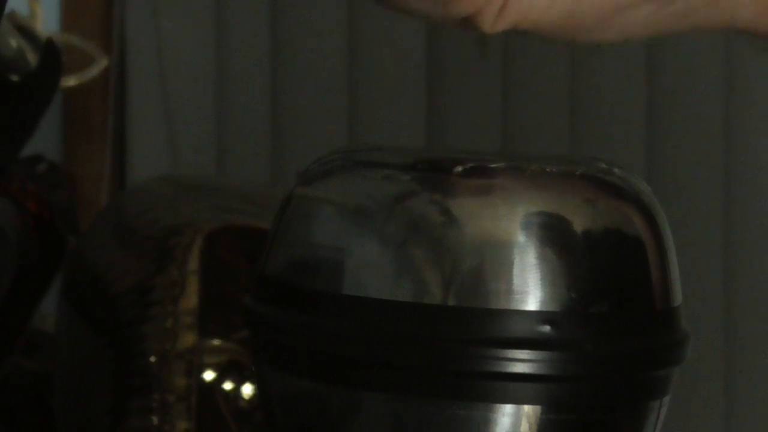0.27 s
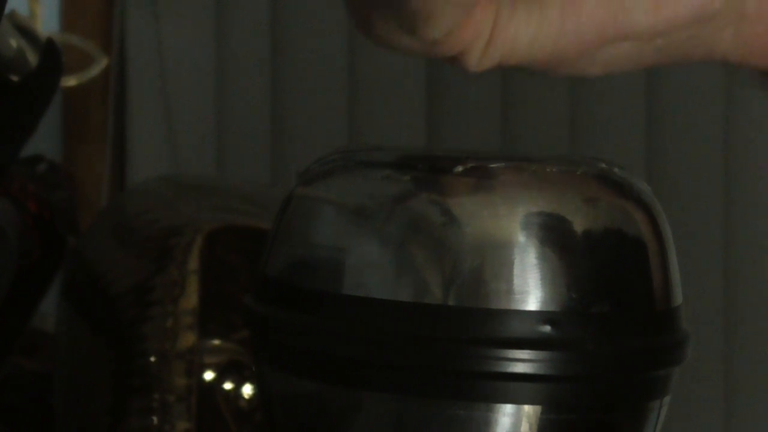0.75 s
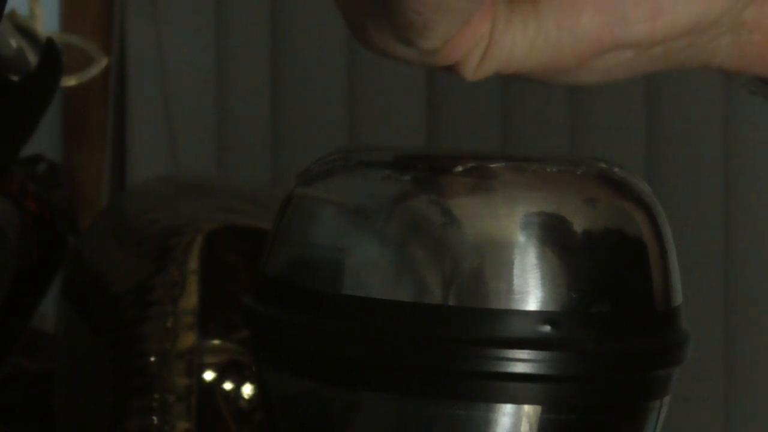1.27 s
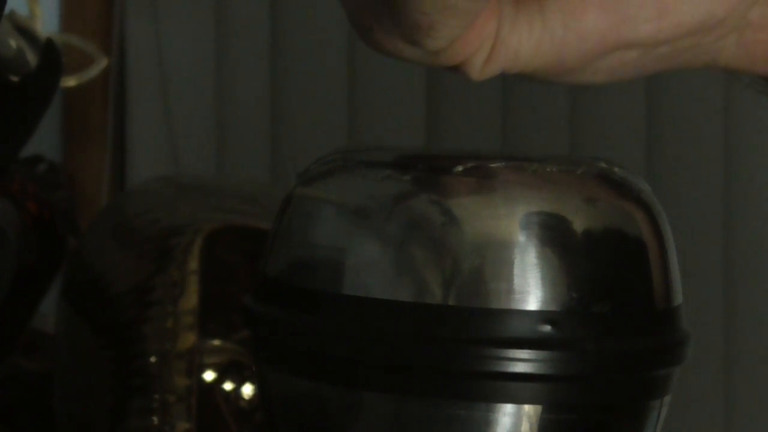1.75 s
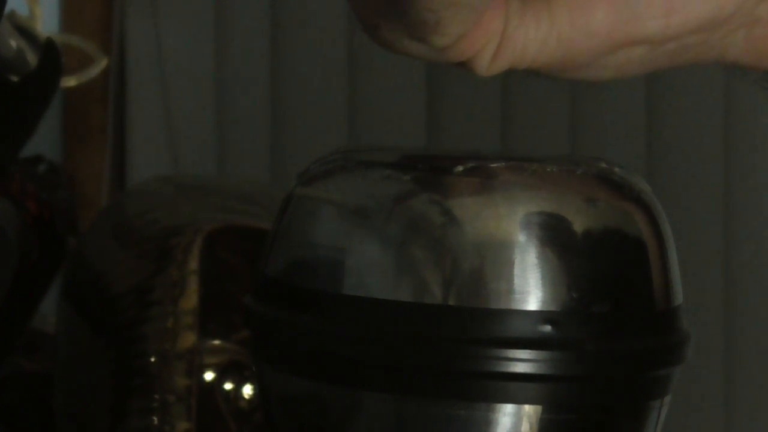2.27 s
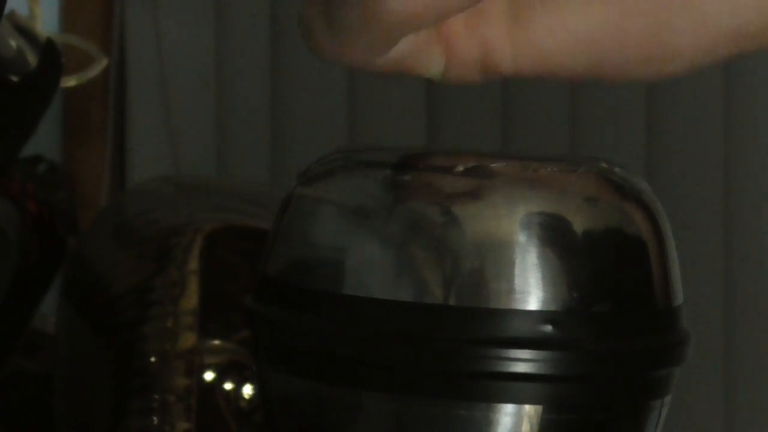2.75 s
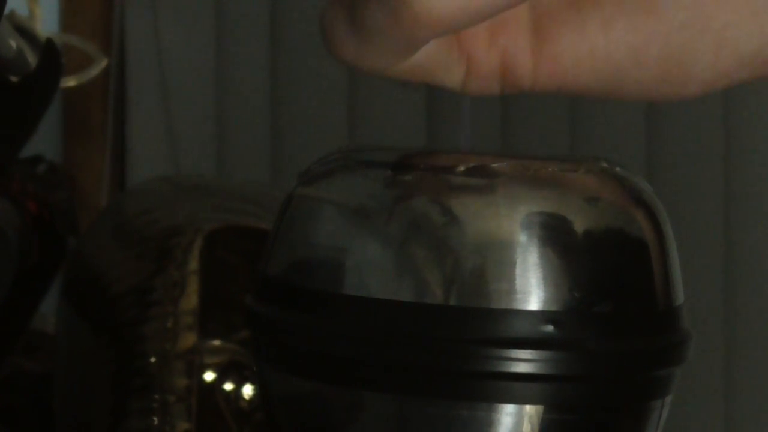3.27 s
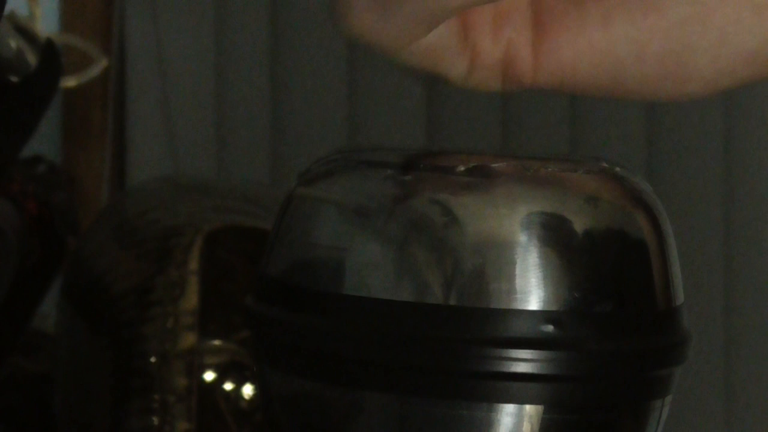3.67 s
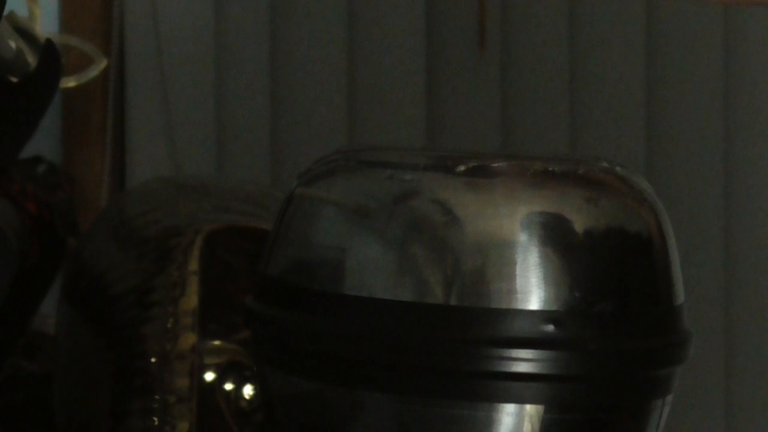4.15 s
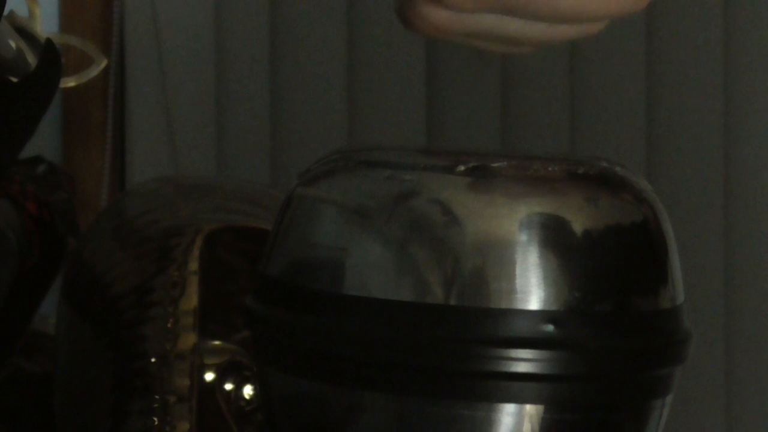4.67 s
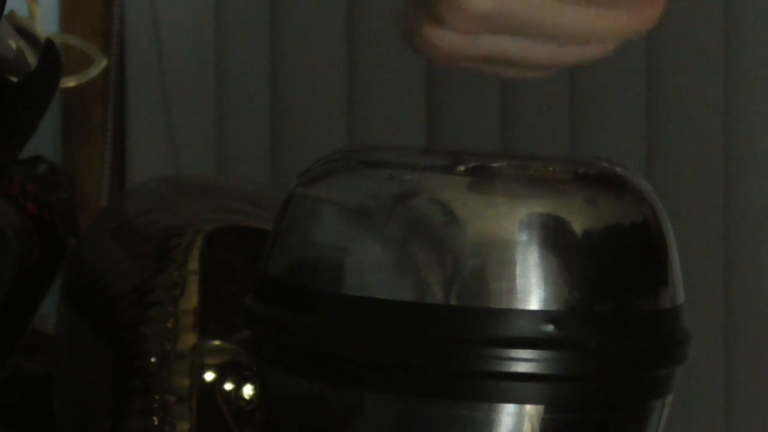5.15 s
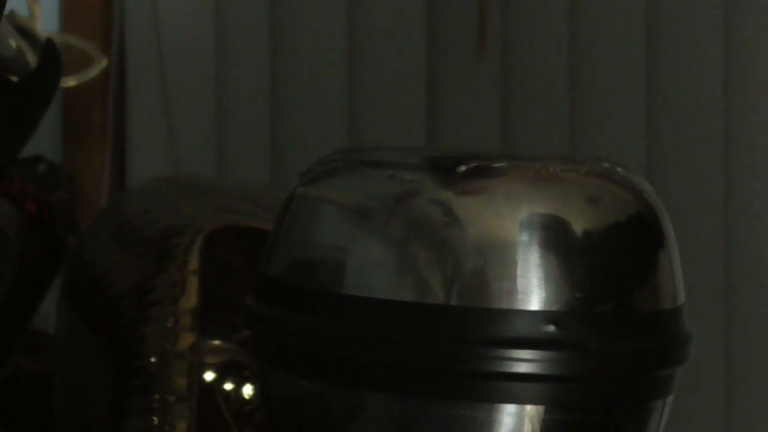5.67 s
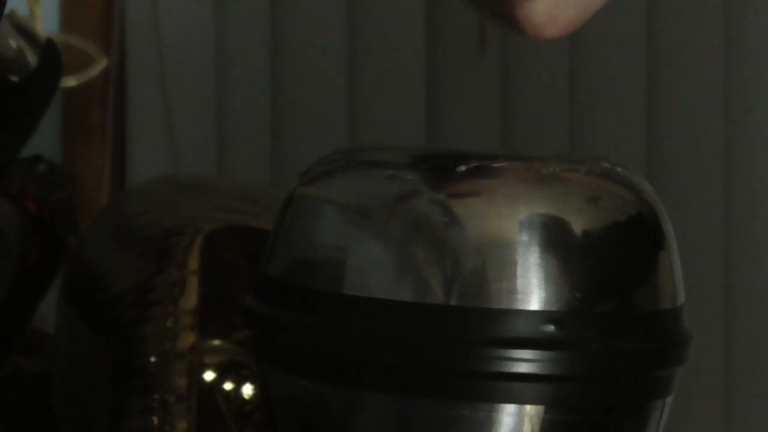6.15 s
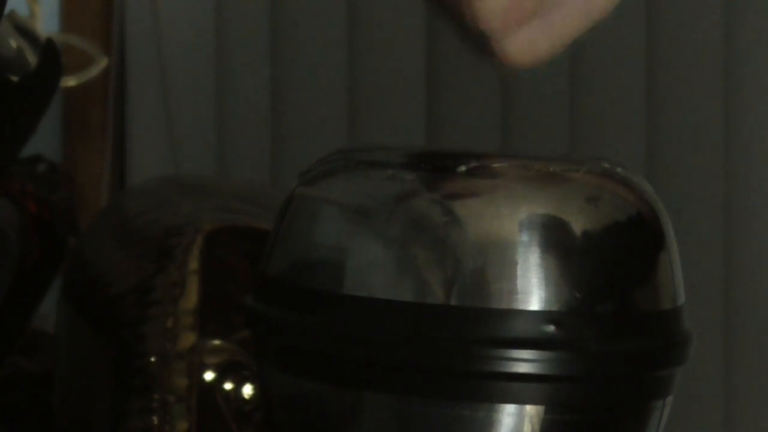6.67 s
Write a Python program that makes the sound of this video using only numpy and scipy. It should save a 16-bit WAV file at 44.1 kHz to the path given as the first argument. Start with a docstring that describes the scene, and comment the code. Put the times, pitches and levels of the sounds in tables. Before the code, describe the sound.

A small belt-driven electrostatic generator runs for about seven seconds, heard close up in a quiet room. Its motor makes a steady, high, scratchy buzz with a metallic ring and a thin whine, wobbling in pitch and loudness about ten times a second. Underneath, the belt rumbles softly, ticks lightly and now and then drags with a brief low hum. Sharp, bright sparks snap from the metal dome to a hand at about 0.7, 2.1 and 3.3 seconds. A faint knock comes at 4.4 seconds. Three sparks follow in quick succession between 5.1 and 5.3 seconds, the third the strongest, and a last one snaps at 6.5 seconds. The sparks are very short and much louder than the motor. The strong ones overload the microphone with a slight thump, and the buzz dips briefly before returning and running on to the end.

```python
"""Sparks snap from the dome of a small belt-driven electrostatic generator to a hand, in a quiet room.
They overload the microphone and make its gain control duck. Under them the motor buzzes, wobbling as
it is braked once per lap of the belt; its brushes scratch over a three-part commutator and ring the can.
The belt rumbles, ticks each lap, and drags now and then so that the frame hums."""
import sys
import numpy as np
from scipy import signal
from scipy.fft import rfft, irfft
from scipy.io import wavfile
from scipy.ndimage import minimum_filter1d

SR = 44100
rng = np.random.default_rng(int(sys.argv[2]) if len(sys.argv) > 2 else 0)


def pcm_store(signal):
    """Save signal as 16-bit PCM."""
    levels = np.round(np.clip(np.atleast_2d(signal), -1, 1) * 32767)
    wavfile.write(sys.argv[1], SR, levels.astype(np.int16).T)


N = 304731
TIME = np.arange(N) / SR
LAP_HZ, LAP_START_S = 10.411, .065   # belt laps: their rate, and a moment when the motor runs fastest


def from_db(db):
    """Decibels to gain."""
    return 10 ** (np.asarray(db) / 20)


def rms_one(x):
    """Scale to rms 1."""
    return x / np.sqrt(np.mean(x ** 2) + 1e-20)


def drift(rate_hz):
    """Smooth random modulation with rms 1."""
    step, run_in = 40, 2000
    r = np.exp(-2 * np.pi * rate_hz * step / SR)
    slow = signal.lfilter([1], [1, -2 * r, r * r], rng.standard_normal(N // step + run_in + 2))[run_in:]
    return np.interp(np.arange(N) / step, np.arange(len(slow)), rms_one(slow))


def bump(s, half_length_s):
    """A smooth swell of height 1."""
    return np.exp(-np.minimum(((TIME - s) / half_length_s) ** 2, 50))


def once_a_lap(at, sharpness):
    """A swell of height 1 on every belt lap; at is the share of a lap after the fastest moment."""
    return np.exp(sharpness * (np.cos(2 * np.pi * (LAP_HZ * (TIME - LAP_START_S) - at)) - 1))


def butter(x, order, hz, kind):
    """Butterworth filter."""
    return signal.sosfilt(signal.butter(order, hz, kind, fs=SR, output="sos"), x)


def resonance(x, hz, width):
    """Two-pole resonance with gain 1 at its peak."""
    r = np.exp(-np.pi * width / SR)
    poles = [1, -2 * r * np.cos(2 * np.pi * hz / SR), r * r]
    return signal.lfilter(np.array([1, 0, -1]) * (1 - r * r) / 2, poles, x + 1e-18)


def convolve(x, response):
    """Pass a sound through an impulse response."""
    return signal.fftconvolve(np.atleast_2d(x), np.atleast_2d(response), axes=1)[:, :N]


def coloured(x, spectrum, size=8192):
    """Minimum-phase EQ along a curve of (f/Hz, level/dB) points."""
    hz, db = np.transpose(spectrum)
    bin_hz = np.arange(size // 2 + 1) * SR / size
    gain = from_db(np.interp(np.log(bin_hz + 1), np.log(hz), db))
    cepstrum = irfft(np.log(gain))
    cepstrum[1:size // 2] *= 2
    cepstrum[size // 2 + 1:] = 0
    return convolve(x, irfft(np.exp(rfft(cepstrum))))


def room(x, wet_db, t60, size=16384):
    """Direct sound plus a dying cloud of reflections, different at each ear."""
    t = np.arange(size) / SR
    cloud = rng.standard_normal((2, size)) * from_db(-60 * t / t60) * (1 - np.exp(-t / .0015))
    return x + from_db(wet_db) * convolve(x, cloud / np.sqrt(np.sum(cloud ** 2) / 2))


# body resonances of the frame: f/Hz, width/Hz, level/dB
FRAME_MODES = [(112, 17.6, -2.5), (276.7, 11.5, 3), (352.6, 13.7, -4), (408.8, 5.6, 2.5),
               (512.8, 11.8, -1.5), (577, 28, -3), (647.4, 23, 0), (687.5, 21, 1), (782.5, 22, 3.5),
               (931, 37, 1.5), (1220, 90, -2.5), (1407, 93, 3), (1930, 415, -0.5)]


def frame(x):
    """The plastic frame sounds through its resonances."""
    return sum((-1) ** k * from_db(db) * resonance(x, hz, width)
               for k, (hz, width, db) in enumerate(FRAME_MODES))


# small knocks on the frame: t/s, level/dB, f/Hz, width/Hz
FRAME_KNOCKS = [(4.089, -50, 114.8, 15), (4.379, -37, 2270, 430), (4.382, -39, 1080, 200),
                (4.38, -31.5, 3470, 500)]


def knocks():
    """The frame is jolted and rings briefly."""
    rings = np.zeros(N)
    for s, db, hz, width in FRAME_KNOCKS:
        age = np.maximum(TIME - s, 0)
        rings += from_db(db) * np.sin(2 * np.pi * hz * age) * np.exp(-np.minimum(np.pi * width * age, 50))
    return room(rings, wet_db=-10, t60=.15)


# the belt drags: t/s, half length/s, rumble lift/dB, hum f/Hz, hum level/dB
BELT_DRAGS = [(0.244, 0.12, -0.5, 569, -57.5), (0.287, 0.049, 3, 182, -45), (1.13, 0.042, 2.5, 182, -46.5),
              (1.48, 0.079, 1, 353.5, -58.5), (1.723, 0.11, 1.5, 352, -59), (2.775, 0.062, 2, 184, -44),
              (2.941, 0.15, -1.5, 578.5, -57), (3.296, 0.059, 4.5, 180.8, -48.5),
              (3.895, 0.057, 4, 182.1, -51), (4.325, .08, 0.5, 352.4, -61), (4.65, 0.12, 2, 352.5, -56),
              (5.012, 0.045, 2, 183, -47), (5.53, 0.066, -1.5, 185.1, -48.5), (6.048, 0.089, 1.5, 352, -59),
              (6.82, 0.063, 1.5, 184, -53)]


def frame_hum(idle_hz=182.5, width_hz=28.6):
    """A low mode of the frame murmurs all the time; when the belt drags, one mode swells unsteadily."""
    murmur = resonance(resonance(rng.standard_normal(N), idle_hz, width_hz), idle_hz, width_hz)
    wavering_time = np.cumsum(1 + .025 * drift(25)) / SR
    swells = sum(from_db(db) * bump(s, half_s) * np.sin(2 * np.pi * hz * wavering_time)
                 for s, half_s, _, hz, db in BELT_DRAGS)
    return from_db(-60.5) * rms_one(murmur) + np.sqrt(2) * swells * from_db(2 * drift(25) - .4)


def belt_rub_db(wander_db=.9, stretch=1.4):
    """How much harder than usual the belt rubs; a drag's rumble outlasts its hum."""
    drags_db = sum(lift_db * bump(s, stretch * half_s) for s, half_s, lift_db, _, _ in BELT_DRAGS)
    return wander_db * drift(1.2) + drags_db


def belt_crackle(rub_db, per_s, level_db):
    """The belt sticks and lets go in tiny dry clicks, denser and louder when it rubs hard."""
    grip = from_db(3.6 * rub_db)
    slips = (rng.random(N) < per_s * grip / SR) * rng.standard_normal(N) * np.sqrt(grip)
    return from_db(level_db) * rms_one(resonance(resonance(slips, 700, 980), 1060, 1500))


# EQ of the rumble of belt and rollers: f/Hz, relative level/dB
RUMBLE_EQ = [(20, 3.5), (60, -10.5), (105, -13.5), (140, -4.5), (200, -2), (250, -4.5), (350, 1),
             (460, -3.5), (620, 1.5), (790, -4), (900, -6.5), (1400, -12.5), (2100, -25.5), (4000, -32.5)]


def belt(rub_db):
    """Rubber running over the rollers: a centred rumble, a wide bed and a thin squeak on every lap."""
    rolling = coloured(rng.standard_normal(N) * from_db(drift(1.7)), RUMBLE_EQ)
    rumble = from_db(-52 + rub_db) * (.65 * rms_one(frame(rolling)) + .27 * rms_one(rolling))
    wide_bed = from_db(-56.5) * rms_one(coloured(rng.standard_normal((2, N)), RUMBLE_EQ))
    hiss = resonance(resonance(rng.standard_normal((2, N)), 12800, 800), 13700, 1200)
    squeak = hiss * once_a_lap(at=.04, sharpness=14) * from_db(3 * drift(5))
    return rumble + wide_bed + from_db(-64.5) * rms_one(squeak)


# accents where the seam hits its guide hard: t/s, level/dB
SEAM_ACCENTS = [(.470, -49.5), (1.425, -53), (1.617, -49.5), (1.812, -52.5), (2.388, -50), (2.964, -54),
                (3.250, -52), (3.730, -52), (4.018, -51), (4.315, -53), (4.800, -53), (4.884, -47.5),
                (5.655, -49), (5.940, -50), (6.229, -52)]


def seam_ticks(lap_share=.15, jitter_s=.006, light_db=-57.5, spread_db=1.3, rise_s=.0055):
    """The seam touches its guide once a lap, mostly lightly, now and then hard."""
    times = np.arange(LAP_START_S + lap_share / LAP_HZ, TIME[-1] - .03, 1 / LAP_HZ)
    chance = rng.standard_normal((len(times), 2))
    light_ticks = zip(times + jitter_s * chance[:, 0], light_db + spread_db * chance[:, 1])
    envelope = np.zeros(N)
    for s, db in [*light_ticks, *SEAM_ACCENTS]:
        at = round(s * SR)
        age = TIME[:N - at][:4096] / rise_s
        span = slice(at, at + len(age))
        envelope[span] = np.maximum(envelope[span], from_db(db) * age * np.exp(1 - age))
    rasp = rms_one(resonance(resonance(rng.standard_normal(N), 3190, 360), 3290, 560))
    return room(envelope * rasp, wet_db=-8, t60=.13)


# motor speed before the wobble: t/s, turning rate/Hz
MOTOR_SPEED = [(0, 96.5), (.5, 100.4), (.8, 97.2), (1.4, 97.8), (2.75, 97.3), (3.05, 98.4), (4.7, 96.8),
               (5.2, 98.5), (5.45, 96.6), (5.8, 98), (6.9, 97.7)]


def rotor_turns(wobble, skew, flutter):
    """Turns made so far: the motor's pitch sags on each belt lap and comes back up slightly faster."""
    lap_phase = 2 * np.pi * LAP_HZ * (TIME - LAP_START_S)
    base_hz = np.interp(TIME, *np.transpose(MOTOR_SPEED))
    sway = 1 + wobble * np.cos(lap_phase) - skew * np.sin(2 * lap_phase) + flutter * drift(12)
    return np.cumsum(base_hz * sway) / SR


def harmonics(turns, partials):
    """Slightly shaky tones on multiples of the turning rate."""
    tones = 0
    for k, db in partials:
        shake = .0009 * k * drift(60)
        flicker_db = 1.5 * drift(25)
        tones += from_db(db + flicker_db) * np.sin(2 * np.pi * (k * turns + shake + rng.random()))
    return np.sqrt(2) * tones


# partials of the whine: multiple of the turning rate, level/dB
WHINE_PARTIALS = [(24, -75), (27, -65.5), (30, -73), (33, -73), (36, -66.5), (39, -63), (42, -61),
                  (45, -63.5), (48, -60.5), (51, -63), (54, -64), (63, -61), (69, -57), (72, -52),
                  (75, -58), (78, -56)]


def commutator_whine(turns):
    """The commutator's whine warbles with the speed and swells under each lap's load."""
    load_db = 7 * (once_a_lap(at=.88, sharpness=.9) - .65)
    return room(from_db(load_db) * harmonics(turns, WHINE_PARTIALS), wet_db=-12, t60=.2)


# laps on which the braked motor throbs hard: t/s, level/dB
THROB_ACCENTS = [(.238, -52), (.875, -46.5), (1.204, -47.5), (1.477, -48), (1.679, -50), (1.774, -46.5),
                 (2.255, -47), (2.343, -50), (2.456, -49), (2.54, -50), (3.503, -50), (3.591, -51),
                 (3.791, -46), (4.276, -49.5), (4.357, -49.5), (4.555, -47), (5.122, -52.5), (5.52, -53),
                 (6.007, -48), (6.087, -49), (6.29, -46), (6.373, -52), (6.768, -46), (6.854, -51)]


def motor_throb(turns):
    """Magnetic pull: a low tone at twice the turning rate that pulses on every lap."""
    pull = from_db(-64 + 8.4 * once_a_lap(at=.89, sharpness=1.3) + 2.5 * drift(6))
    accents = sum(from_db(db) * bump(s, half_length_s=.023) for s, db in THROB_ACCENTS)
    return np.sqrt(2) * np.maximum(pull, accents) * np.sin(4 * np.pi * turns)


# partials of the rotor: multiple of the turning rate, level into the frame/dB
ROTOR_PARTIALS = [(1, -64), (3, -64), (4, -68.5), (5, -62), (6, -59), (7, -64.5), (8, -58), (10, -73),
                  (12, -58), (14, -75.5), (15, -65), (18, -73.5)]


def rotor(turns):
    """Unbalance and magnetic pull: tones sweep the frame's resonances over a low end of throb and hum."""
    low_end = room(motor_throb(turns) + frame_hum(), wet_db=-31, t60=.072) * from_db([[.7], [-.7]])
    return room(frame(harmonics(turns, ROTOR_PARTIALS)), wet_db=-16, t60=.28) + low_end


# metallic ring of the motor can: f/Hz, width/Hz, relative level left/dB, right/dB, left ear's lead/rad
CAN_MODES = [(4940, 150, -13, -12.5, -2), (6420, 510, -9.5, -10.5, 1.06), (7100, 340, -10, -2, 1.5),
             (7380, 380, -4.5, -0.5, 1.18), (7800, 550, 1.5, -13.5, 0.8), (8202, 346, 0.5, 4.5, 1.15),
             (8374, 335, 3, -3.5, 1.34), (8670, 130, -9, -2.5, 1.5), (9500, 410, -3, -3.5, 2),
             (10450, 390, -7.5, -4, -1.1), (11790, 190, -20, -11, 0.2), (13440, 400, -40, -17, 4),
             (14700, 520, -44, -23, -2.5)]


def motor_can(drive):
    """The can rings in steep-sided modes, out of phase at the two ears; the top ones flare each lap."""
    flared = drive * from_db(6.5 * once_a_lap(at=.02, sharpness=2) - 2.6)
    modes = 0
    for k, (hz, width, left_db, right_db, lead) in enumerate(CAN_MODES):
        r = np.exp(-np.pi * width / SR)
        pole = r * np.exp(2j * np.pi * hz / SR)
        ring = signal.lfilter([(1 - r) ** 2], [1, -2 * pole, pole * pole], flared if hz > 10000 else drive)
        at_ears = np.real(ring * np.exp(.5j * lead * np.array([[1], [-1]])))
        modes += (-1) ** k * from_db([[left_db], [right_db]]) * at_ears
    return rms_one(room(modes, wet_db=-6, t60=.25))


def housing(x, ring_s, size=512):
    """Short paths through the motor housing smear each click, differently towards each side."""
    paths = rng.standard_normal((2, size)) * TIME[:size] * np.exp(-TIME[:size] / ring_s)
    return convolve(x, paths / np.sqrt(np.sum(paths ** 2, axis=1, keepdims=True)))


def brush_contacts(turns, gap_db=(1, -1.4, .3), uneven_db=.5, jitter_s=.00005, scrape_s=.0038):
    """Each of three commutator gaps gives a click, never quite on time, and a short scrape."""
    at = np.flatnonzero(np.diff(np.floor(3 * turns))) + 1
    chance = rng.standard_normal((len(at), 2))
    at = np.clip(np.round(at + jitter_s * SR * chance[:, 0]).astype(int), 0, N - 1)
    clicks = np.zeros(N)
    clicks[at] = from_db(np.resize(gap_db, len(at)) - uneven_db * chance[:, 1])
    scrape_envelope = signal.lfilter([1], [1, -np.exp(-1 / (scrape_s * SR))], clicks)
    return rms_one(clicks) + .5 * rms_one(scrape_envelope * rng.standard_normal(N))


# EQ of the brushes' scratch: f/Hz, relative level/dB
SCRATCH_EQ = [(1500, -23.5), (2100, -20), (2380, -22), (2510, -9), (2730, -9), (2890, -23), (3130, -7),
              (3420, -8.5), (3550, -9.5), (3800, -2), (4550, -3.5), (4730, -0.5), (5170, -1.5), (5400, -1),
              (5900, 2.5), (6080, -1.5), (6400, -6), (9000, 3), (9950, -1), (10750, 1.5), (11200, -3),
              (12300, -4), (13500, -14.5), (15300, -16), (16500, -81)]


def brushes(turns):
    """The contacts ring the can and scratch directly, louder and brighter when the motor is fast."""
    effort = from_db(3.1 * once_a_lap(at=.0075, sharpness=.37))
    drive = effort * brush_contacts(turns)
    ring = motor_can(drive)
    sliding = effort * rng.standard_normal(N)
    friction = .5 * drive + .077 * housing(drive, ring_s=.00043) + 1.4 * sliding
    scratch = rms_one(room(coloured(friction, SCRATCH_EQ), wet_db=-6.5, t60=.16))
    return from_db(-37) * ring + from_db(-44.5) * scratch * from_db([[-.1], [.1]])


# short rings of the dome: f/Hz, width/Hz, level/dB
DOME_MODES = [(1200, 180, -1), (3000, 1800, -1)]


def dome(blows):
    """The dome rings briefly under each spark."""
    return sum(from_db(db) * resonance(blows, hz, width) for hz, width, db in DOME_MODES)


# early reflections of a snap: delay/s, level/dB
SNAP_REFLECTIONS = [(.0009, -14), (.0029, -24), (.0071, -22), (.0088, -25), (.0195, -30)]


def reflections(snaps, jitter_s=.00004, scatter_s=.0006):
    """Dome, hand and table throw each snap back at once, as distinct echoes and a short scatter."""
    echoes = np.zeros((2, N))
    for delay, db in SNAP_REFLECTIONS:
        for side in range(2):
            lag = round((delay + rng.normal(0, jitter_s)) * SR)
            echoes[side] += from_db(db) * np.roll(snaps[side], lag)
    scatter = rng.standard_normal((2, 256)) * np.exp(-TIME[:256] / scatter_s)
    return echoes + from_db(-22) * convolve(snaps, scatter)


# stereo EQ of a snap: f/Hz, left level/dB, right level/dB
SNAP_EQ = [(100, -14, -18), (1100, -10, -16), (2130, -5.5, -10), (3140, -2, -3), (4280, 2, -1.5),
           (5100, 1.5, 6), (7400, -2.5, -8), (10500, 1.5, 5.5), (12500, -6.5, 4.5), (15100, -14.5, -10)]
# spark hits, levels before filtering: t/s, snap level/dB, low cut/Hz, high cut/Hz, pop/dB, dome knock/dB
SPARK_HITS = [(0.7367, 10.5, 4700, 16600, -6, -9), (2.075, 9.5, 4903, 16100, -1.5, -12),
              (3.342, 9, 4800, 15300, -18, -17), (5.1382, 4.5, 5100, 16300, -14, -7),
              (5.2473, 2, 2700, 11500, -28, -7), (5.278, 12, 5150, 16700, -33, -21),
              (6.4940, 8.5, 5100, 16000, -36, -4)]


def sparks(pop_band_hz=(38, 1100)):
    """Each spark is a shock front and a knock on the dome, over a low pop, with a duller room tail."""
    fronts, pop_hits, blows = np.zeros((3, N))
    for s, db, low_hz, high_hz, pop_db, knock_db in SPARK_HITS:
        at = round(s * SR)
        pop_hits[at], blows[at] = -from_db(pop_db), from_db(knock_db)
        fronts[at:at + 128] -= from_db(db) * butter(signal.unit_impulse(128), 2, [low_hz, high_hz], "band")
    snaps = np.vstack([coloured(fronts, np.array(SNAP_EQ)[:, [0, side]]) for side in (1, 2)])
    close = snaps + dome(blows) + reflections(snaps)
    tail = room(close, wet_db=-11, t60=.19) - close
    pops = butter(pop_hits + 1e-18, 2, pop_band_hz, "band")   # the centred part of the overload thump
    return close + pops + butter(tail, 1, 14500, "low")


def scene():
    """Motor and belt as the bed, the sparks on top."""
    turns = rotor_turns(wobble=.058, skew=.004, flutter=.004)
    rub_db = belt_rub_db()
    motor = brushes(turns) + commutator_whine(turns) + rotor(turns)
    belt_noise = belt(rub_db) + seam_ticks() + belt_crackle(rub_db, per_s=88, level_db=-67)
    return motor + belt_noise + knocks() + sparks()


def overload_thump(dry, ceiling, hold_samples=22):
    """The overdriven capsule sticks briefly and swings back: a dull thump, opposite in the two channels."""
    excess = np.maximum(np.abs(dry).max(axis=0) - 1.2 * ceiling, 0)
    held = -minimum_filter1d(-excess, hold_samples)
    stuck = np.tanh(1.6 * np.roll(held, hold_samples // 2))
    swing = butter(stuck, 1, [60, 2000], "band")
    return butter(swing, 2, 2200, "low") * from_db([[-13.6], [-12.6]]) * [[1], [-1]]


def gain_control(x, threshold_db, slope, release_db_per_s, attack_s):
    """Peaks over the threshold pull the gain down; it creeps back."""
    peak_db = 20 * np.log10(np.abs(x).max(axis=0) + 1e-9)
    duck_db = slope * np.maximum(peak_db - threshold_db, 0)
    held_db = np.maximum.accumulate(duck_db + release_db_per_s * TIME) - release_db_per_s * TIME
    r = np.exp(-1 / (attack_s * SR))
    return from_db(-signal.lfilter([1 - r], [1, -r], held_db))


def record(dry):
    """Overload flattens the snaps and leaves a thump; the gain ducks; lows and top are cut."""
    ceiling = .52
    clipped = ceiling * np.tanh(dry / ceiling) + overload_thump(dry, ceiling)
    ducked = clipped * gain_control(dry, threshold_db=-9, slope=.52, release_db_per_s=31, attack_s=.0096)
    top_cut = signal.cheby2(14, 60, 17000, fs=SR, output="sos")
    return signal.sosfilt(top_cut, butter(ducked, 2, 70, "high"))


dry = scene()
out = record(dry)
pcm_store(out)
```